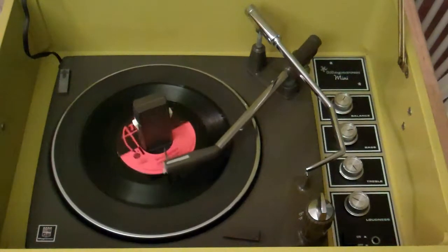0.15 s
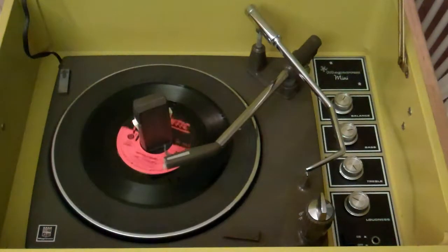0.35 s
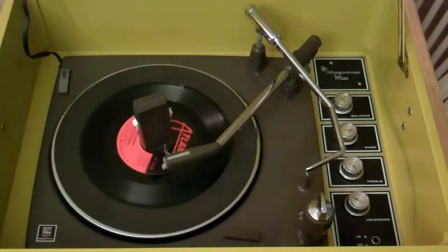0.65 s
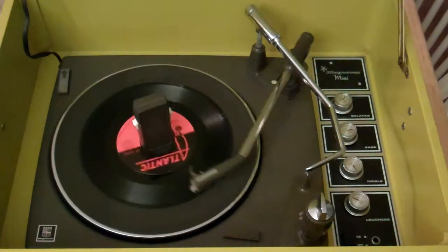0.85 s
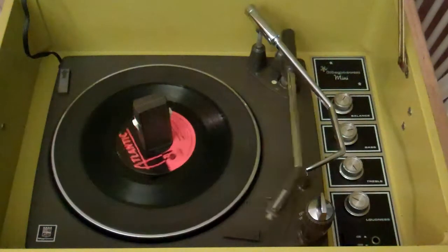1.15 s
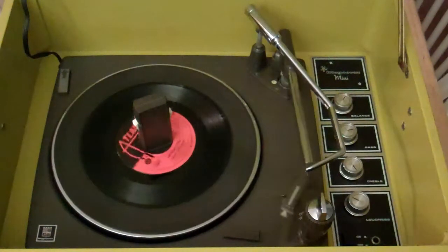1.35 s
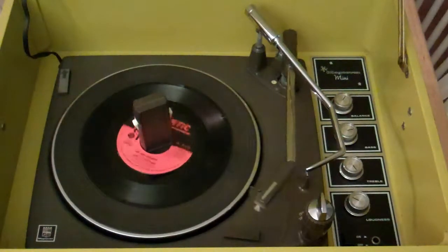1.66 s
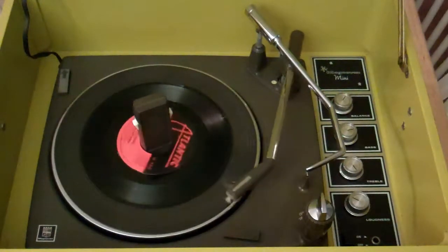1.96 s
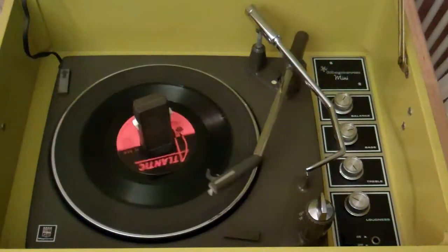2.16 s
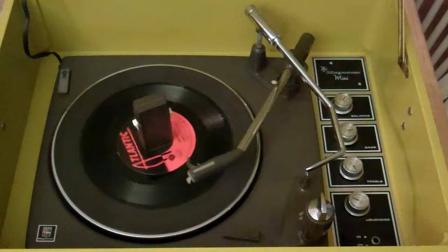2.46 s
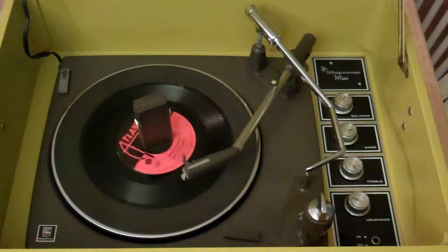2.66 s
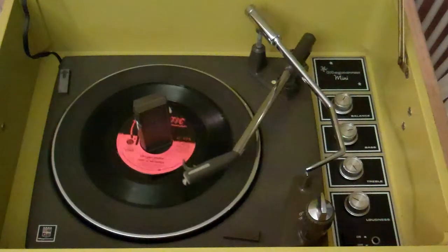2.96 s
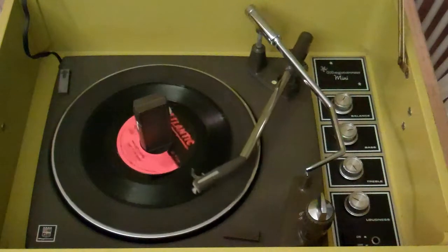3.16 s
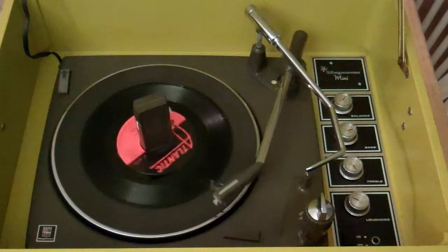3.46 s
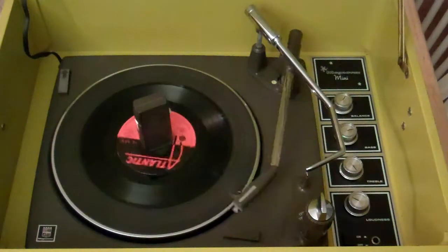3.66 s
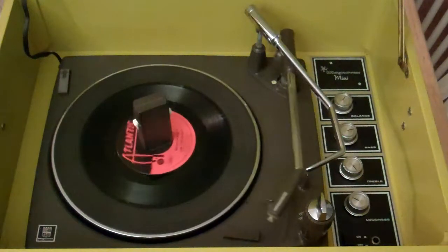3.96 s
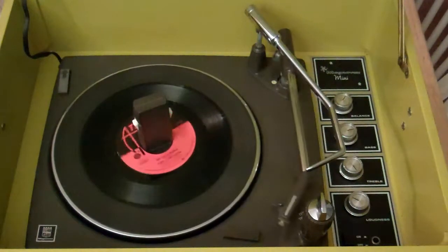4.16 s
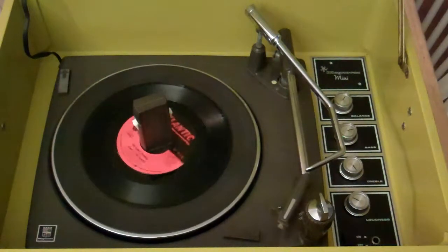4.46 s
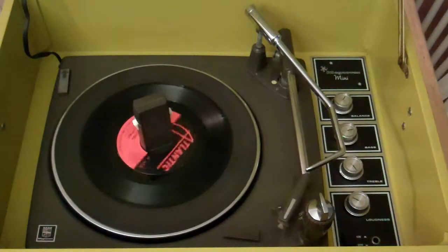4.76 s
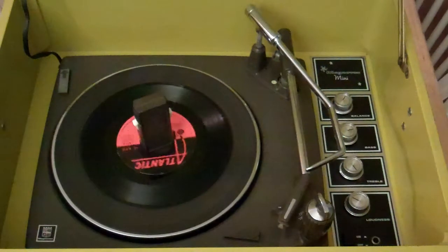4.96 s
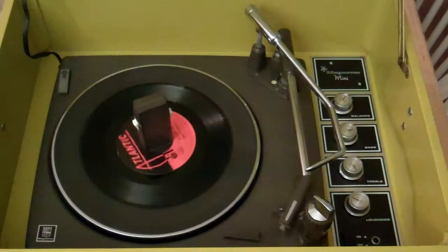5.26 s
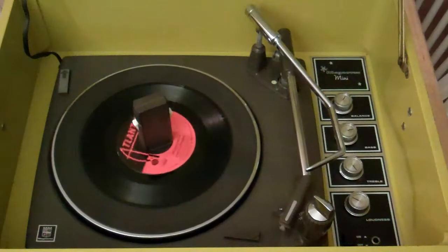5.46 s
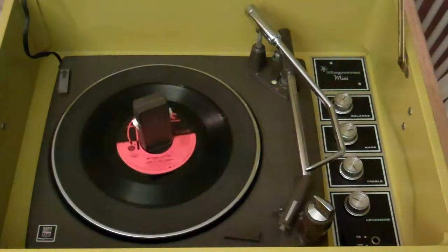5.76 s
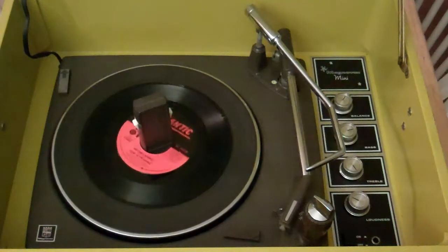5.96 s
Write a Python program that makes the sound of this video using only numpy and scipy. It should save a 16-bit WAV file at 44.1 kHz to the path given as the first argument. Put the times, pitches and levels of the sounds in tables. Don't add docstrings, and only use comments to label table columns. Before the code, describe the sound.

An old turntable's automatic mechanism heard by a nearby camera microphone indoors. Low hum, wheel rumble with soft bumps and a grainy whirr run beneath scattered woody taps and bright steel clicks. A very loud, short latch snap is followed by calmer running, then heavy clunks as parts drop and the motor stops. Small snaps, one strong final snap with a short rattle, then near-quiet hiss.

```python
import sys
import numpy as np
from scipy import signal
from scipy.fft import rfft, irfft, next_fast_len
from scipy.io import wavfile
from scipy.ndimage import map_coordinates

SR = 44100
rng = np.random.default_rng(int(sys.argv[2]) if len(sys.argv) > 2 else 0)


def convert_level_to_amplitude(level_db):
    exponent = np.asarray(level_db, float) / 20
    return 10 ** exponent


def to_wav(s):
    ch = np.atleast_2d(s).T
    pcm = np.round(np.clip(ch, -1, 1) * 32767)
    wavfile.write(sys.argv[1], SR, pcm.astype(np.int16))


N = 269927


def along(points, hz):
    f, v = np.transpose(points)
    return np.interp(np.log(hz + 1), np.log(f + 1), v)


def spectrum_of(points):
    return lambda hz: convert_level_to_amplitude(along(points, hz))


def wobble(rate):
    knots = rng.standard_normal(int(N * rate / SR) + 4)
    return map_coordinates(knots, [np.arange(N) * rate / SR])


def filtered(x, response):
    m = next_fast_len(x.shape[-1] + 4096)
    spectrum = rfft(x, m) * response(np.fft.rfftfreq(m, 1 / SR))
    return irfft(spectrum, m)[..., :x.shape[-1]]


def noise(spectrum, alike, count):
    def mid_and_side(hz):
        turn = np.arccos(np.clip(alike(hz), -1, 1)) / 2
        return spectrum(hz) * [np.cos(turn), np.sin(turn)]
    mid, side = filtered(rng.standard_normal((2, count)), mid_and_side)
    pair = np.array([mid + side, mid - side])
    return pair / np.sqrt(np.mean(pair ** 2))


def band(centre_hz, octaves):
    return lambda hz: np.exp(-.5 * np.abs(np.log2((hz + 1) / centre_hz) / octaves) ** 3)


# pitch in Hz, level in dB rms, rate of its polarity square wave in Hz (two flips a cycle).
WHINE = (7867.1, -74, 14.985)
# frequency in Hz, level in dB per Hz.
HISS = [(12, -22.5), (20, 1), (151, -5), (183, -4), (242, -2), (278, -4), (421, -3), (484, -5), (818, -5.5),
        (889, -5.5), (3550, -10), (7100, -15.5), (7930, -15), (11700, -29.5), (15000, -75.5)]


def camera():
    t = np.arange(N) / SR
    hiss = convert_level_to_amplitude(-59.5) * noise(spectrum_of(HISS), lambda hz: 0.17 + 0 * hz, count=N)
    whine_hz, whine_db, flip_hz = WHINE
    polarity = np.tanh(4 * np.sin(2 * np.pi * flip_hz * t))
    whine = convert_level_to_amplitude(whine_db - 3.5) * polarity * np.sin(2 * np.pi * whine_hz * t)
    return hiss * convert_level_to_amplitude([[.4], [-.4]]) + np.sqrt(2) * whine * convert_level_to_amplitude([[2.5], [-2.5]])


# start in seconds, depth in dB, hold in seconds.
DUCKS = [
    (-.03, 14.5, .2),
    (0.766, 4.5, 0.12),
    (2.908, 17.5, 0.16),
    (4.21, 17.5, .16),
    (4.463, 15.5, .18),
    (5.013, 18.5, 0.2),
    (5.75, 5.5, .4),
]


def gain_db(s):
    rest_db, duck_s = 2.5, 0.041
    quick_s, slow_s, slow_share = .11, 0.96, 0.33
    cuts = []
    for start_s, depth_db, hold_s in DUCKS:
        since = np.maximum(s - start_s, 0)
        free = np.maximum(since - hold_s, 0)
        back = (1 - slow_share) * np.exp(-free / quick_s) + slow_share * np.exp(-free / slow_s)
        cuts.append(depth_db * (1 - np.exp(-since / duck_s)) * back)
    return rest_db - np.max(cuts, axis=0)


def add(track, s, sound):
    start = round(s * SR)
    track[:, start:start + sound.shape[-1]] += sound / convert_level_to_amplitude(gain_db(s))


# start in seconds, first bump in dB, second bump in dB.
LUMPS = [
    (.21, -53, -71),
    (0.899, -47, -45),
    (1.469, -44.5, -42.5),
    (2.064, -42, -46),
    (2.545, -43, -66),
    (3.235, -53, -50),
    (3.797, -45.5, -72.5),
]


def idler_bumps():
    track = np.zeros((2, N + SR))
    t = np.arange(SR // 4) / SR
    shape = convert_level_to_amplitude(-4.5 - 60 * t / 0.16) * (1 - np.exp(-t / 0.014))
    for s, first_db, second_db in LUMPS:
        add(track, s, convert_level_to_amplitude(first_db) * shape * np.sin(2 * np.pi * 97 * t))
        add(track, s + .17, convert_level_to_amplitude(second_db) * shape * np.sin(2 * np.pi * 101.6 * t))
    return track[:, :N]


# time in seconds, level in dB.
LOAD = [(0, 10), (.6, -6), (1, 2.5), (1.6, -0.5), (2.1, 1), (2.6, 0.8), (3.1, 2), (3.5, -.6), (3.8, -6),
        (4.1, -1.5), (4.45, -5)]
# pitch in Hz, level in dB, wander in Hz.
HUM = [(119, -4.5, 0.55), (238, -12, 1), (1104, -2.5, 7), (1222, -10.5, 5.3), (2410, -12, 7)]
# frequency in Hz, level in dB per Hz.
RUMBLE = [(25, -35), (50, -16.5), (70, 0.5), (103, -3.5), (147, -8.5), (233, -13.5), (300, -10), (400, -33),
          (660, -120)]
# frequency in Hz, level in dB per Hz.
WHIRR = [(88, -32.5), (150, -1.5), (319, -1.5), (405, 2), (498, -3), (632, -7.5), (938, -8), (1090, -7),
         (1520, -10), (2330, -11), (6610, -13.5), (7850, -24), (9000, -22.5), (11700, -52), (19800, -120)]


def motor():
    t = np.arange(N) / SR
    switch_s, coast_db_per_s = 4.47, 300
    brake_s, brake_db = 4.2, -9.5
    load_db = np.interp(t, *np.transpose(LOAD))
    coast_db = -coast_db_per_s * np.maximum(t - switch_s, 0)
    hum_db = -68.5 + coast_db + brake_db * (t > brake_s)
    rumble_db = -77.5 + 1.8 * load_db + coast_db
    whirr_db = -69 + load_db + coast_db
    hum = 0
    for hz, db, wander_hz in HUM:
        level = convert_level_to_amplitude(db + 1.6 * wobble(25.03))
        phase = 2 * np.pi * np.cumsum(hz + wander_hz * wobble(30.63)) / SR
        hum = hum + level * np.sin(phase)
    rumble = noise(spectrum_of(RUMBLE), lambda hz: 0.89 + 0 * hz, count=N) * convert_level_to_amplitude(5.4 * wobble(6.2))
    whirr = noise(spectrum_of(WHIRR), lambda hz: .7 + 0 * hz, count=N) * convert_level_to_amplitude(2 * wobble(20))
    steady = np.sqrt(2) * convert_level_to_amplitude(hum_db) * hum + convert_level_to_amplitude(rumble_db) * rumble + convert_level_to_amplitude(whirr_db) * whirr
    return steady + idler_bumps()


# pitch in Hz, width in Hz, level in dB.
CASE = [(404, 31, -3), (673, 78, 0), (1180, 110, -2), (1460, 97, -4)]
# pitch in Hz, width in Hz, level in dB.
CHASSIS = [(2080, 17, -2), (2610, 13, -8.5), (2855, 39, -4), (3940, 41, 6), (5400, 160, -4.5),
           (5970, 53, -16.5), (7100, 160, 6), (7520, 33, -17), (7630, 49, -7.5), (8160, 9.8, -14.5),
           (9050, 56, -7.5), (9600, 34, -4), (10000, 220, -2.5), (10150, 39, -1)]


def resonances(hz):
    modes = 0
    for centre, width, db in CASE + CHASSIS:
        w = max(width, centre / 25)
        modes = modes + convert_level_to_amplitude(db) * 1j * hz * w / (centre * centre - hz * hz + 1j * hz * w)
    return convert_level_to_amplitude(-5) + convert_level_to_amplitude(-11.5) * modes


# frequency in Hz, likeness from 0 to 1.
ALIKE = [(200, 1), (2000, 0.95), (5000, 0.8), (10000, 0.17)]


def contacts(track, events, thud_db, rise, ring_db, case_db, case_t60):
    t = np.arange(SR // 6) / SR

    def part(hz, octaves):
        return noise(band(hz, octaves), lambda f: along(ALIKE, f), count=len(t))

    for s, db, bright_db, ring_hz, t60 in events:
        bounces = np.interp(t, np.arange(200) * 0.0011, rng.standard_normal(200))
        chatter = convert_level_to_amplitude(2.12 * bounces)
        crack = 1 + 1.05 * convert_level_to_amplitude(-60 * t / 0.011)
        direct = (1 - np.exp(-t / rise)) * crack * chatter * convert_level_to_amplitude(-60 * t / t60)
        fade = direct + (1 - np.exp(-t / 0.005)) * convert_level_to_amplitude(case_db - 60 * t / case_t60)
        thud = convert_level_to_amplitude(thud_db) * part(690, 1.0) * fade ** 0.79
        clack = part(np.sqrt(2500 * np.clip(ring_hz, 1800, 4200)), .66) * fade
        bright = convert_level_to_amplitude(bright_db) * part(7500, 0.76) * fade ** 1.22
        ring = convert_level_to_amplitude(ring_db) * part(ring_hz, 0.074) * direct
        add(track, s, convert_level_to_amplitude(db - 7.0) * (thud + clack + bright + ring))


def lightly(events, decay):
    return [(s, db, bright_db, hz, decay * convert_level_to_amplitude(-.25 * (db + 38))) for s, db, bright_db, hz in events]


# start in seconds, peak in dB, brightness in dB, ringing in Hz.
TAPS = [(.31, -40.5, 2, 5400), (.6922, -55, -19, 1640), (.7612, -35.5, -7, 2300), (.807, -38, -6.5, 7100),
        (.8872, -48, -11, 1750), (.9358, -51, -9, 2700), (.9816, -44, -8, 7430), (1.3201, -39.5, 2, 4800),
        (2.3963, -45.5, -19, 1740), (2.5385, -42.5, -13, 2150), (2.5524, -43.5, -3, 4500),
        (3.3212, -51.5, -9, 2900), (3.5206, -48.5, -7, 4040)]
# start in seconds, peak in dB, brightness in dB, ringing in Hz.
TICKS = [(.0004, -31, 3.5, 3000), (0.0722, -40, -13, 2400), (.114, -50.5, -18, 2080),
         (0.2987, -35.5, -23, 2470), (1.27, -46, -13, 3750), (1.65, -36.5, 1.5, 4000),
         (2.161, -46.5, -3, 2360), (2.4448, -45, -8, 3600), (2.5031, -48, -17, 3700),
         (2.7311, -46.5, -8, 3030), (5.9116, -53, -1, 6660)]
# start in seconds, peak in dB, brightness in dB, ringing in Hz.
CLICKS = [
    (.1445, -59.5, -1, 3100),
    (1.073, -35, -5.5, 3800),
    (1.4817, -32, 6.5, 3680),
    (2.105, -54, 5.5, 2020),
    (2.1915, -31, -3.5, 4250),
]


def light_contacts(track):
    light = dict(rise=0.00062, ring_db=-2.5, case_db=-19, case_t60=0.34)
    contacts(track, lightly(TAPS, decay=0.058), thud_db=-1.5, **light)
    contacts(track, lightly(TICKS, decay=0.053), thud_db=-9.5, **light)
    contacts(track, lightly(CLICKS, decay=0.068), thud_db=-18.5, **light)


# start in seconds, peak in dB, brightness in dB, ringing in Hz, t60 in seconds.
RELEASE = [
    (2.9096, -16, -1.5, 3000, .042),
]
# start in seconds, peak in dB, brightness in dB, ringing in Hz, t60 in seconds.
BLOWS = [
    (4.115, -32.5, -16, 7550, .033),
    (4.138, -27.5, -4.5, 1910, .075),
    (4.182, -25.5, -11, 2470, 0.055),
    (4.21, -22, 6.5, 7040, .03),
    (4.4542, -26, 6.5, 9480, 0.053),
    (4.4859, -27.5, 1, 2610, 0.075),
    (5.1093, -48, 5.5, 2920, 0.047),
]
# start in seconds, peak in dB, brightness in dB, ringing
# in Hz, t60 in seconds.
SNAPS = [
    (4.4281, -39, 0, 1740, .046),
    (4.4406, -54, 0, 3840, .04),
    (4.4595, -26, -14, 3900, .055),
    (4.4903, -27, 7.5, 4100, 0.045),
    (4.74, -42.5, 7.5, 3900, 0.047),
    (4.8615, -38, -2, 4050, 0.067),
    (4.8964, -38.5, -6.5, 4050, 0.048),
    (5.0153, -20, 6, 3500, .04),
    (5.0218, -28.5, 7.5, 4100, .19),
    (2.5796, -39.5, 6, 3850, .025),
]
# start in seconds, peak in dB, brightness in dB, ringing in Hz, t60 in seconds.
SLIDES = [
    (.0028, -61, 11, 9700, 0.36),
    (4.0631, -47.5, -7, 1746, 0.18),
    (4.1074, -37.5, -8, 3990, 0.088),
    (4.126, -41, -15, 4000, .07),
    (4.1628, -30.5, -8, 2400, .085),
    (4.9956, -48, -2, 3900, 0.2),
]


def heavy_contacts(track):
    heavy = dict(rise=.00067, ring_db=-1.7, case_db=-17, case_t60=.31)
    contacts(track, RELEASE, thud_db=-13, **heavy)
    contacts(track, BLOWS, thud_db=-4.5, **heavy)
    contacts(track, SNAPS, thud_db=-22, **heavy)
    contacts(track, SLIDES, thud_db=-2, **heavy)


def one_resonance(track, events, rise, decay):
    t = np.arange(SR // 6) / SR
    for s, db, hz in events:
        body = noise(band(hz, .1), lambda f: .9 + 0 * f, count=len(t))
        t60 = decay * (hz / 1000) ** -0.25
        add(track, s, convert_level_to_amplitude(db - 60 * t / t60) * (1 - np.exp(-t / rise)) * body)


# start in seconds, peak in dB, pitch in Hz.
KNOCKS = [(0, -39.5, 141), (0, -41, 186), (0.074, -64, 3700), (.299, -46.5, 1950), (.3, -56.5, 324),
          (4.14, -39.5, 603), (4.182, -44, 329), (1.311, -50, 1444), (1.483, -52, 1300), (2.39, -51.5, 408),
          (2.54, -48.5, 664), (2.907, -31.5, 1570), (3.325, -56, 335), (4.211, -46, 7140),
          (4.861, -46.5, 5350), (.764, -47, 1400), (5.017, -42.5, 1607), (5.018, -51, 420),
          (5.021, -42, 1150), (5.022, -42, 2020)]
# start in seconds, peak in dB, pitch in Hz.
RAPS = [
    (2.908, -43.5, 302),
    (2.908, -31, 768),
    (2.907, -29.5, 2700),
    (2.91, -29, 5330),
]
# start in seconds, peak in dB, pitch in Hz.
SCRAPES = [
    (.81, -51, 624),
    (0.898, -55, 224),
    (.93, -45, 632),
    (4.137, -49, 230),
    (4.453, -53, 220),
    (4.96, -59, 8900),
]


def cam(track):
    one_resonance(track, KNOCKS, rise=0.0018, decay=0.1)
    one_resonance(track, RAPS, rise=0.00094, decay=0.032)
    one_resonance(track, SCRAPES, rise=0.019, decay=0.2)


# start in seconds, level in dB.
RINGS = [
    (2.9099, -24.5),
    (4.2112, -35),
    (1.4825, -31.5),
    (2.1925, -41),
    (4.8618, -44),
]
# pitch in Hz, level in dB, t60 in seconds.
LATCH = [(1211, -17, .12), (1520, -9, .06), (2700, -9, .06), (3350, -10, .08), (4110, -5, .07),
         (4034, -18, .6), (5400, -16, .4), (6718, -15, .12), (6950, -19, .45), (7407, -16, .15),
         (9776, -18, .1)]
# pitch in Hz, level in dB, t60 in seconds.
LEVER = [(887, -14, .14), (1450, -14, .1), (2500, -16, .08), (4759, -1, .11), (7000, -9, .2),
         (7500, -9, .07), (9870, -3, .11), (10800, -12, .07)]
# pitch in Hz, level in dB, t60 in seconds.
PAWL = [(2159, -17, 0.12), (3070, -18, 0.078), (3585, -10, 0.072), (3747, -4, 0.07), (4600, -1.5, 0.049),
        (6580, 0, 0.041), (6977, -16.5, 0.044), (7400, -19.5, 0.053), (7397, -17, 0.052),
        (9017, -11, 0.053)]
# pitch in Hz, level in dB, t60 in seconds.
TRIP = [(1690, -13, 0.13), (2358, -21, 0.48), (2929, -17, 0.17), (3090, -1, 0.043), (3596, -14, 0.097),
        (3970, 2.5, 0.049), (4775, 4, 0.031), (5570, -1, 0.057), (6950, -6, 0.05), (9631, -26, 0.12)]
# pitch in Hz, level in dB, t60 in seconds.
SPRING = [(2396, -11, 0.24), (3850, 1, 0.038), (4264, -13.5, 0.089), (4786, -8, 0.058), (5523, -8, 0.08),
          (6900, -7, 0.035), (7445, -23, 0.13), (9109, -17, 0.063)]


def steel(track):
    t = np.arange(SR // 3) / SR
    for (s, db), modes in zip(RINGS, (LATCH, LEVER, PAWL, TRIP, SPRING)):
        for hz, level_db, t60 in modes:
            blur = noise(band(hz, .015), lambda f: .8 + 0 * f, count=len(t))
            tone = np.sin(2 * np.pi * (hz * t + 0.27 * rng.random((2, 1))))
            add(track, s, convert_level_to_amplitude(db + level_db - 60 * t / t60) * (.45 * tone + .6 * blur))


# frequency in Hz, level in dB.
MICROPHONE = [(60, -26.5), (150, -10), (250, -2.5), (9500, -3), (11000, -9.5), (12500, -19.5), (14000, -20),
              (15300, -32), (16500, -44)]
# frequency in Hz, left over right in dB.
LEAN = [(60, 0.97), (110, 2.45), (200, 0.18), (380, 0.5), (690, 0.99), (1280, 1.0), (2350, 0.9),
        (4340, 1.45), (8000, 6.5), (14700, 2.45)]


def mechanism():
    track = np.zeros((2, N + SR))
    light_contacts(track)
    heavy_contacts(track)
    track = convert_level_to_amplitude(1.5) * filtered(track, resonances)
    cam(track)
    steel(track)
    return filtered(track[:, :N], lambda hz: convert_level_to_amplitude(along(MICROPHONE, hz) + along(LEAN, hz) * [[.5], [-.5]]))


def scene():
    return camera() + motor() + mechanism()


def low_pass(x):
    return signal.sosfilt(signal.butter(12, 15340, fs=SR, output="sos"), x)


def record(dry):
    mix = dry * convert_level_to_amplitude(gain_db(np.arange(N) / SR))
    return low_pass(mix)


dry = scene()
out = record(dry)
to_wav(out)
```